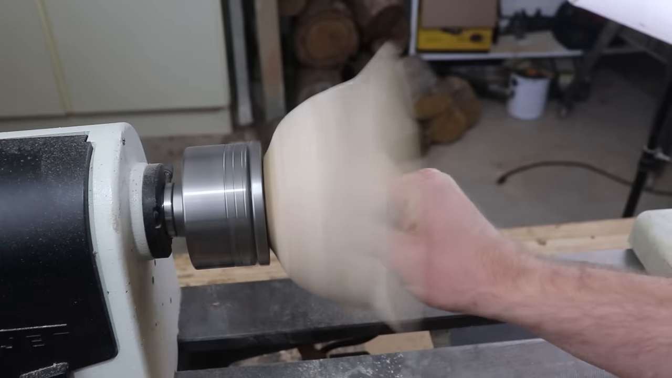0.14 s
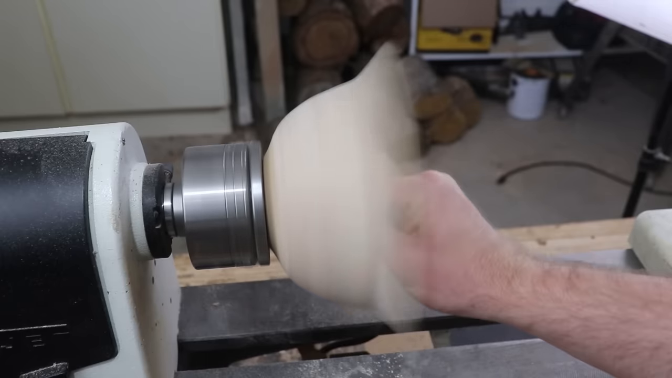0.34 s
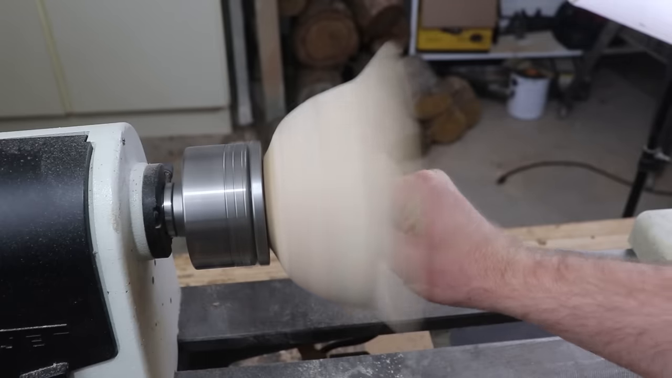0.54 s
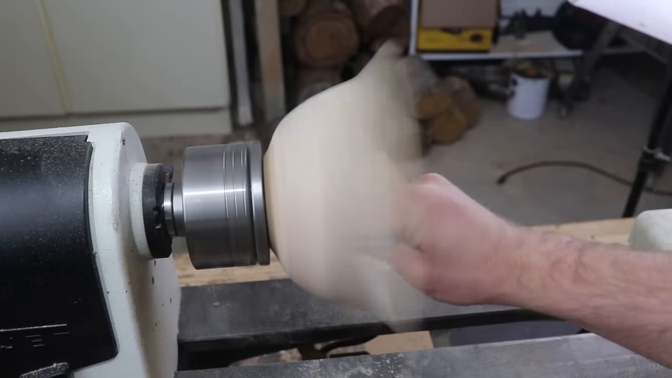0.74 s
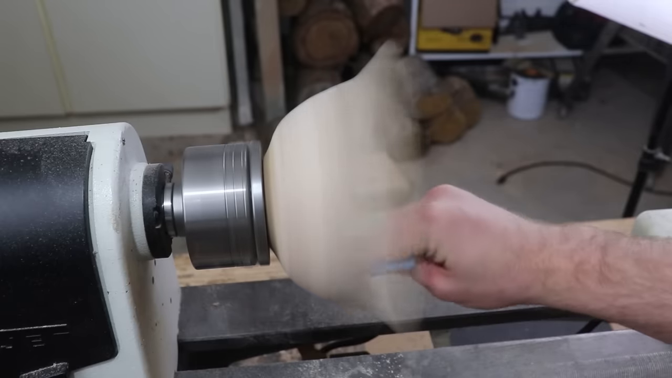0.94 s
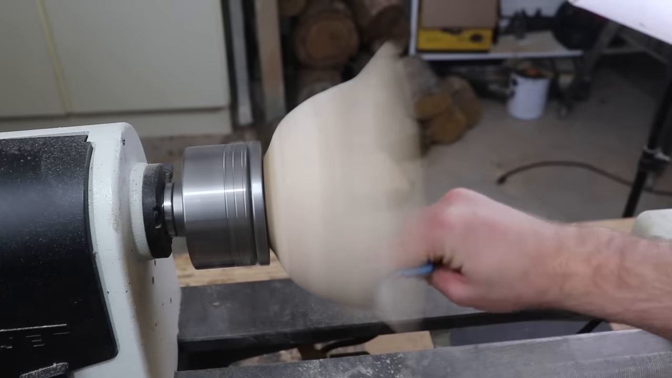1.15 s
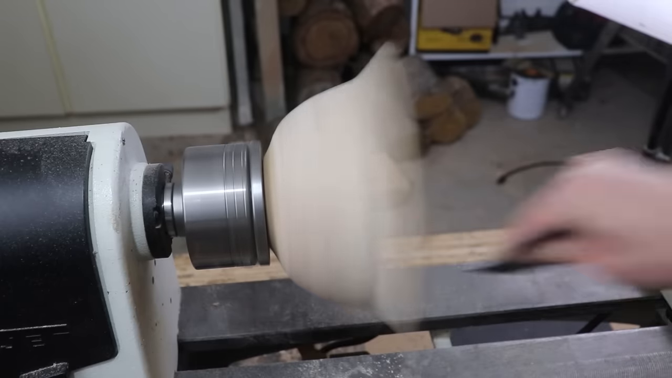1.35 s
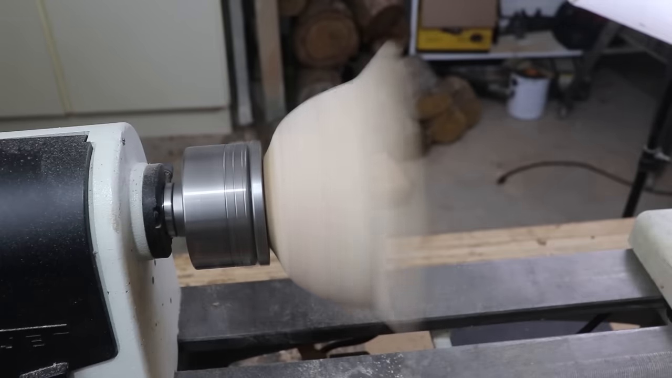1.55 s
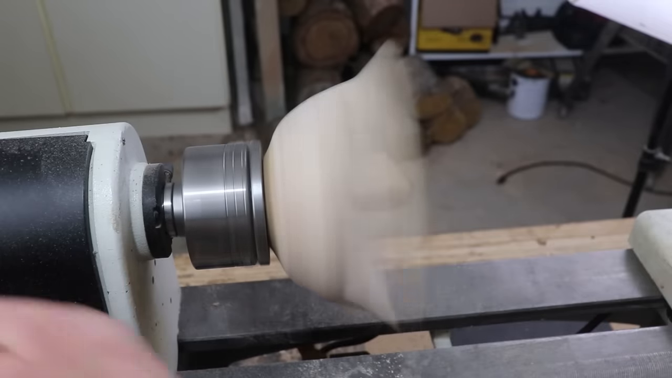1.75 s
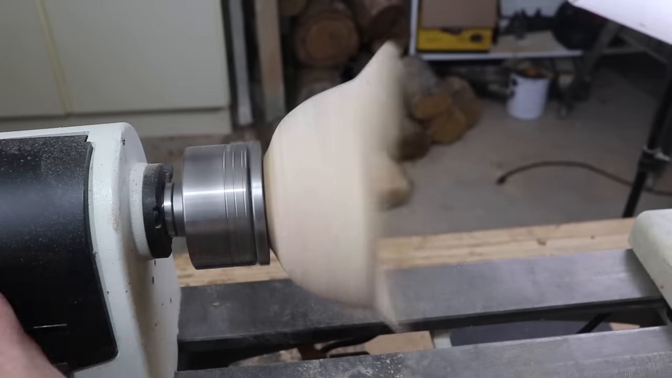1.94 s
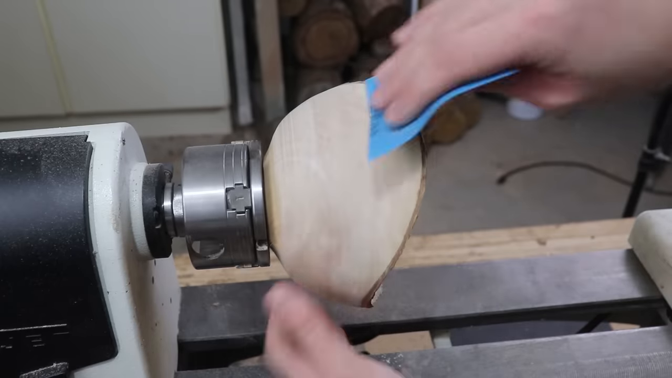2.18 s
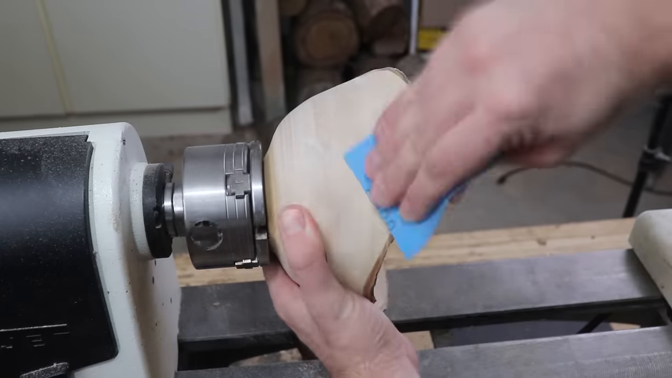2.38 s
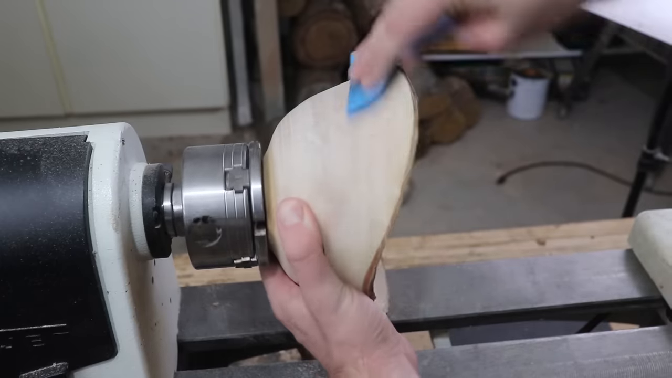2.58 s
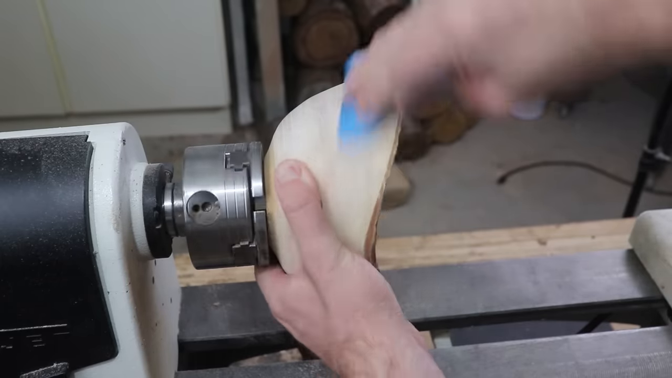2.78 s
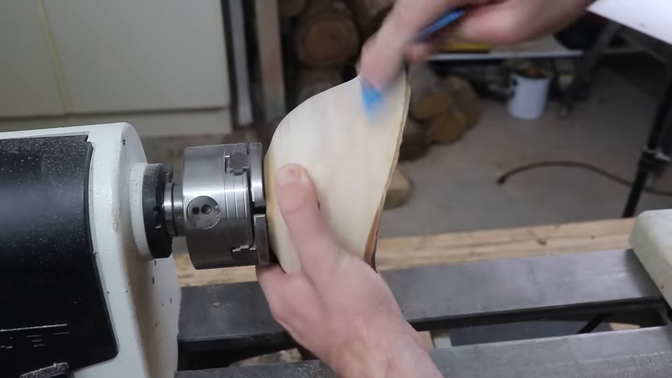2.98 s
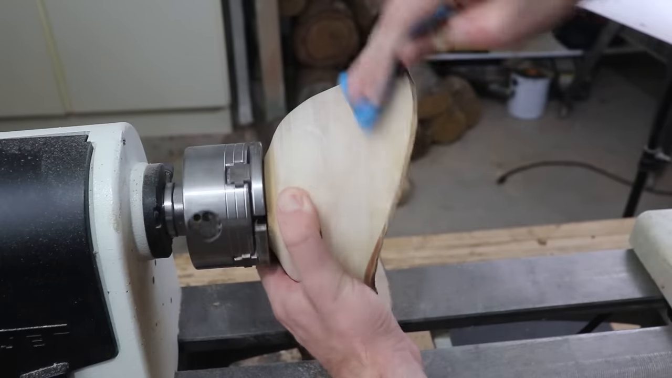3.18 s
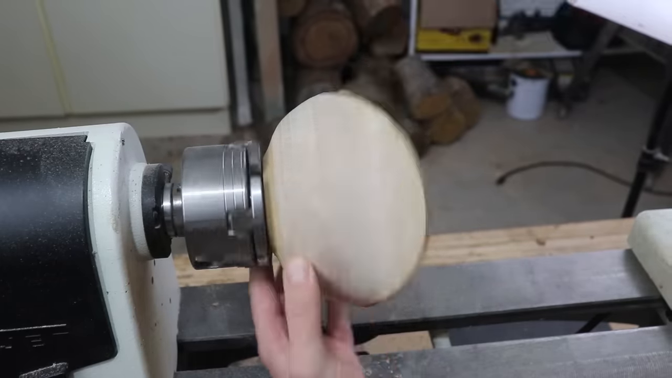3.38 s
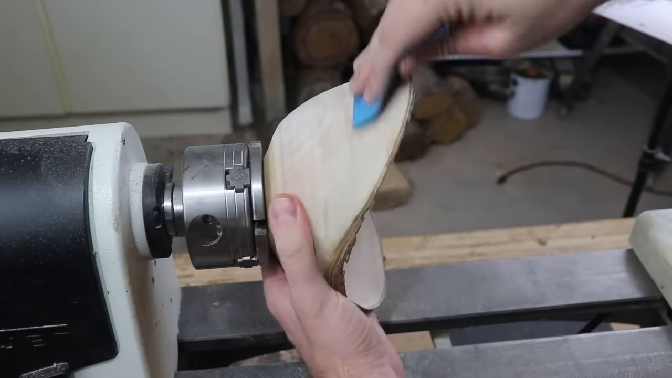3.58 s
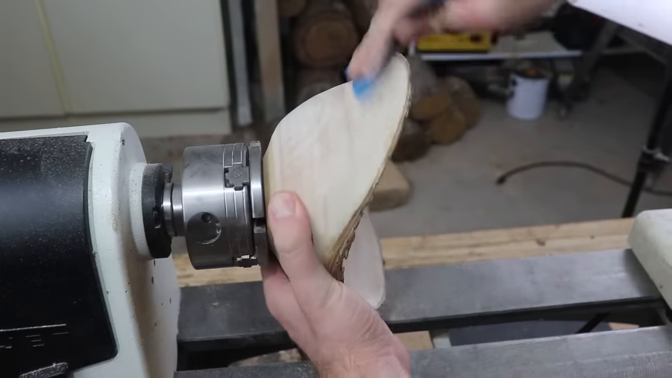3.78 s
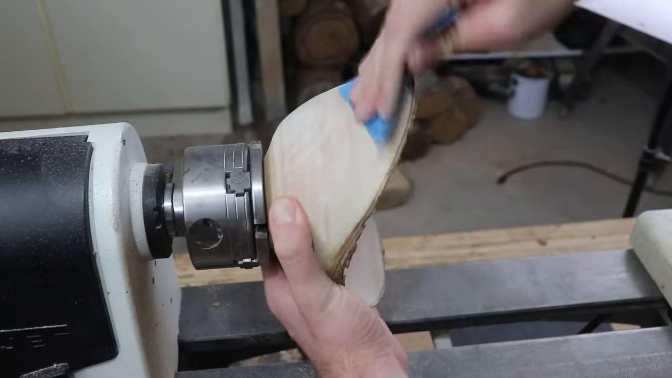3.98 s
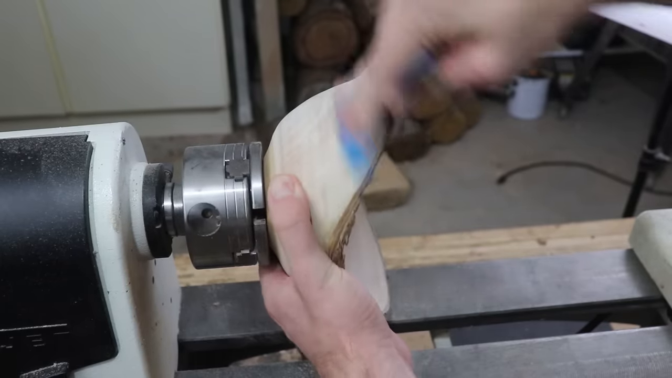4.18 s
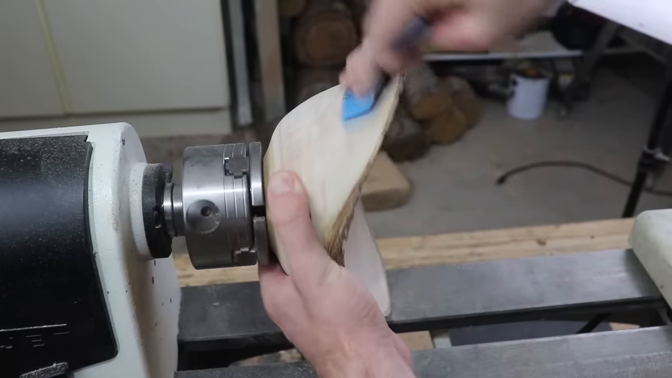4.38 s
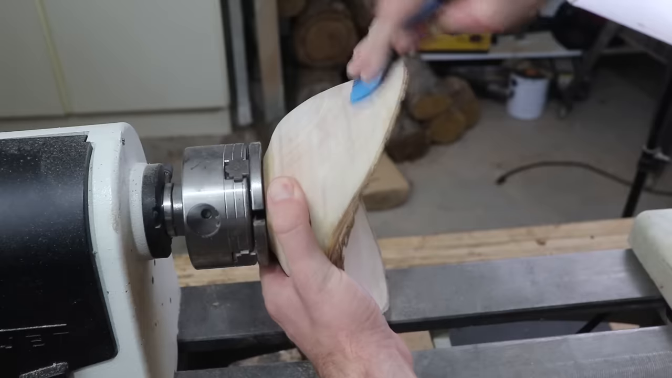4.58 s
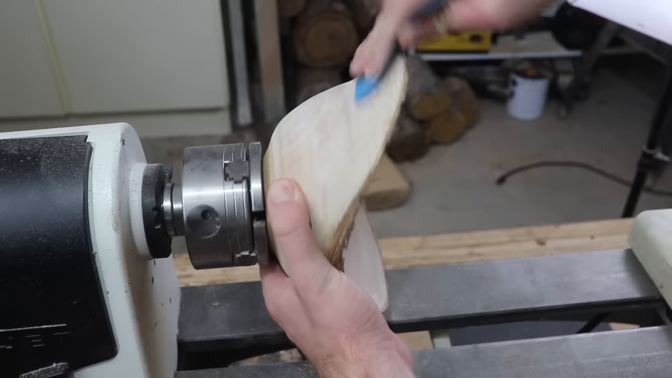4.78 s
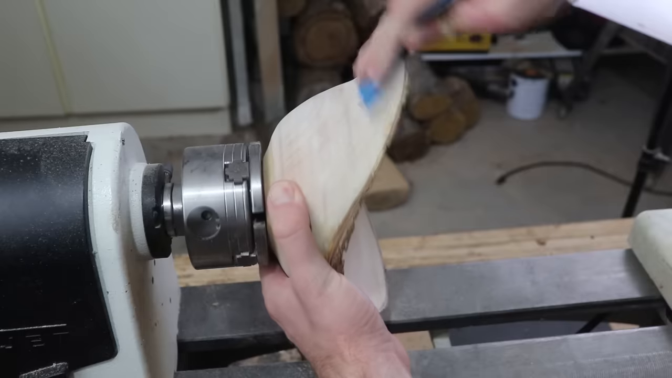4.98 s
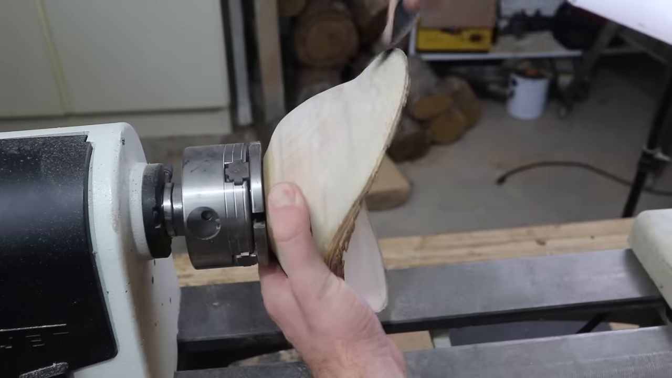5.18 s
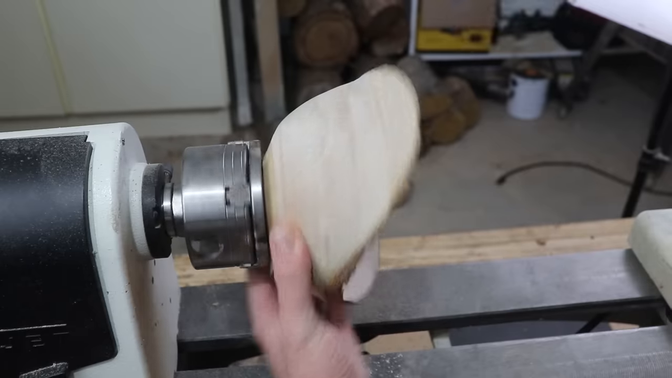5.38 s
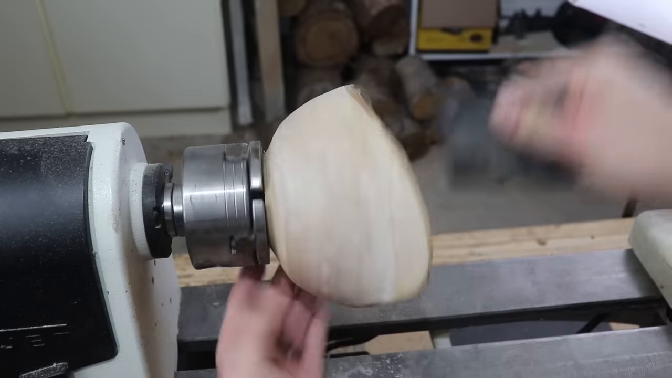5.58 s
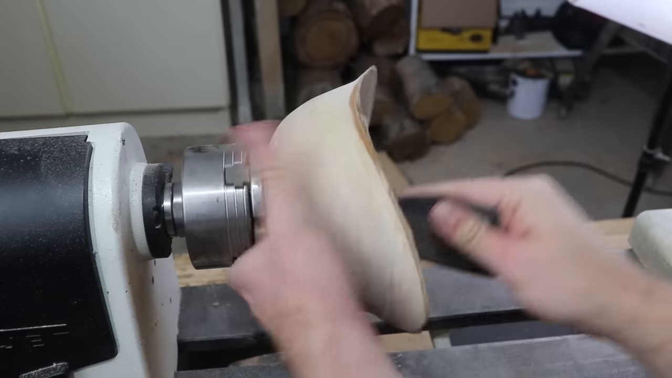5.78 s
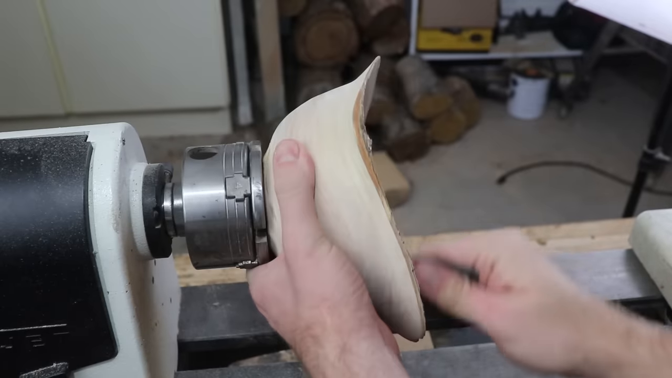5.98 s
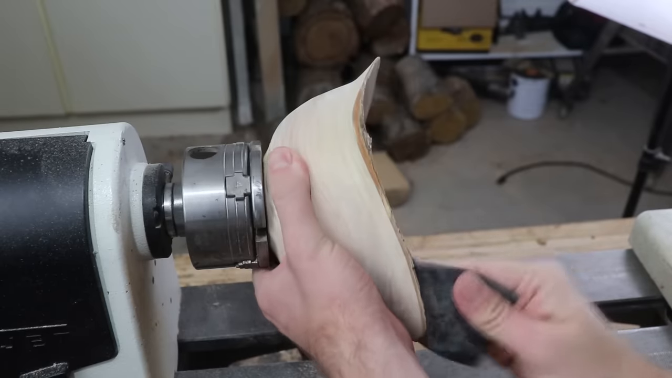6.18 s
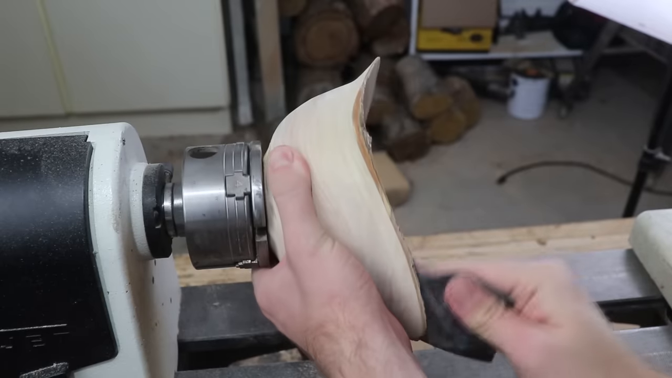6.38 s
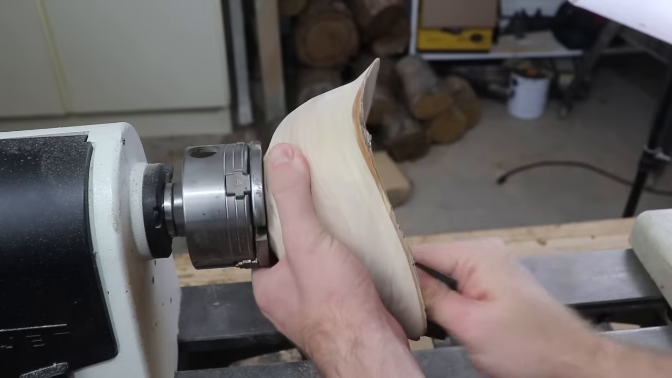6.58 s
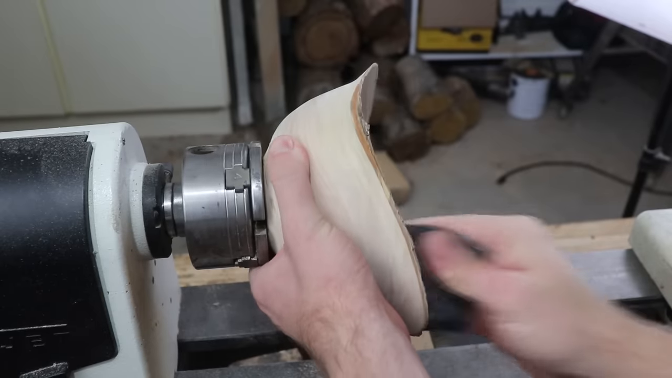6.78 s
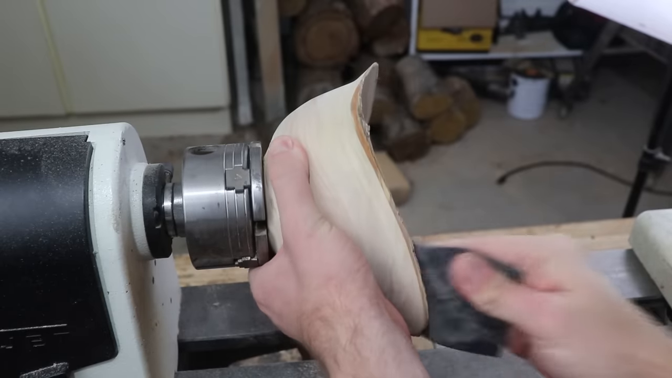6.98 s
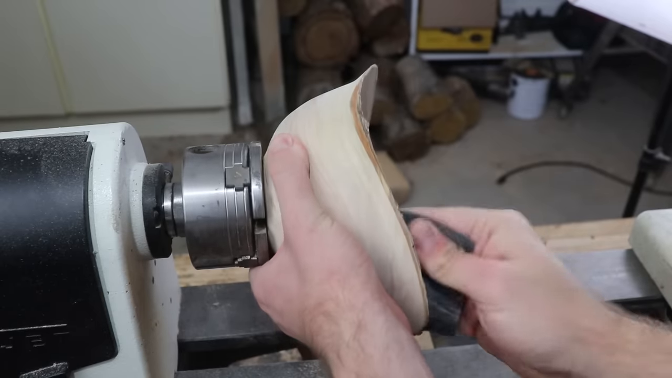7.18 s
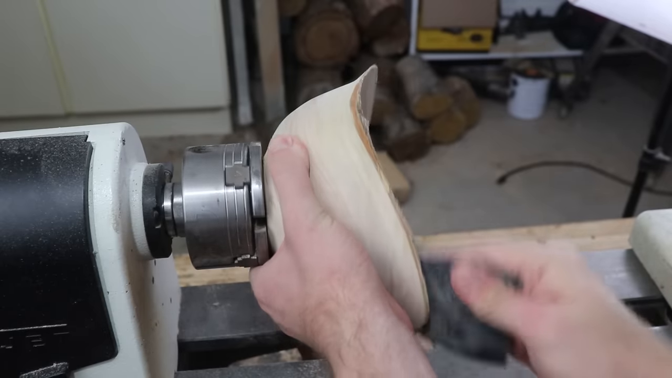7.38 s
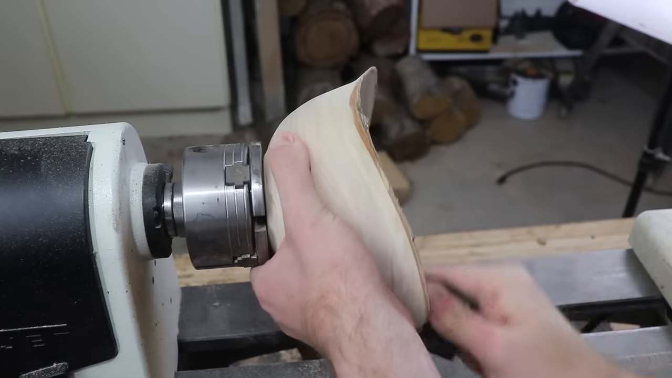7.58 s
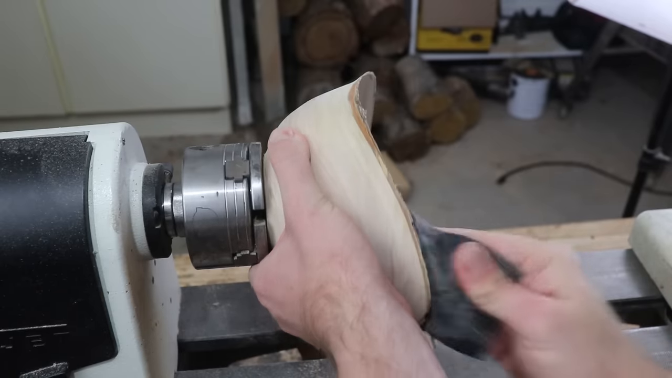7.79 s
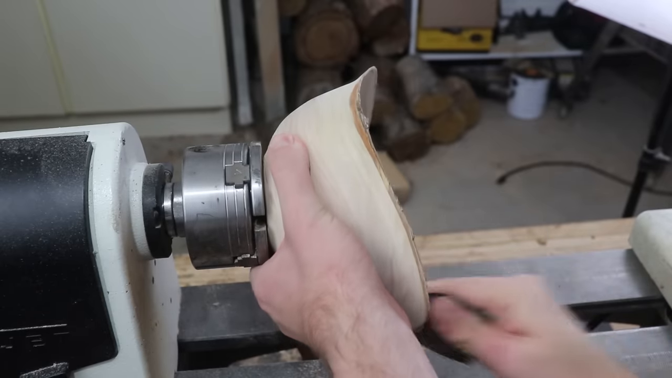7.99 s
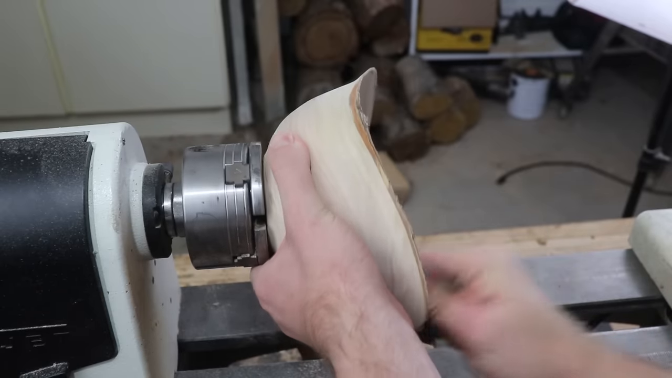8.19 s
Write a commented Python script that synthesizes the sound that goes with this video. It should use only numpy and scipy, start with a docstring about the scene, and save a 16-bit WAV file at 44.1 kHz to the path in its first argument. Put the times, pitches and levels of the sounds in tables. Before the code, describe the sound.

Sandpaper hisses on a wooden bowl spinning over a humming lathe, a switch snaps off, then frantic and slower hand-sanding strokes follow.

```python
"""Paper rasps a wooden bowl spinning on a workshop lathe: dense grit noise excites the modes of the wood.
A switch snaps as a noise crack and plastic ring; hum and rotor tones stop, whirr and casing coast on.
Sanding of the outside follows in two sped-up, time-lapse flurries of strokes that blur into a flutter;
slower hand strokes come next, ending in the hollow inside. Blows ring the bowl from the spinning onwards.
A filtered-noise wash lies under all; a far drone swells from the second flurry, then a rush passes."""
import sys
import numpy as np
from scipy import signal
from scipy.fft import rfft, irfft, next_fast_len
from scipy.io import wavfile
from scipy.ndimage import uniform_filter1d, minimum_filter1d

SR = 44100
rng = np.random.default_rng(int(sys.argv[2]) if len(sys.argv) > 2 else 0)


def amplitude_ratio(level_db):
    """Convert a level in decibels to the matching linear amplitude (field) ratio."""
    exponent = np.asarray(level_db, float) / 20
    return 10 ** exponent


def generate_wav(signal):
    """Clip the signal to [-1, 1] and save it as 16-bit WAV at the path in sys.argv[1]."""
    frames = np.transpose(np.atleast_2d(signal))
    scaled = np.clip(frames, -1, 1) * 32767
    pcm = np.round(scaled).astype(np.int16)
    wavfile.write(sys.argv[1], SR, pcm)


N = 363815

# Wash of room and outdoors, relative spectral density: f/Hz, level/dB
AIR_SPECTRUM = [(12, -56), (20, -33), (74, -3.5), (276, -5.5), (345, -7.5), (397, -6.5), (525, -6.5),
                (571, -7.5), (694, -7.5), (798, -8), (918, -6), (1520, -15), (5180, -35), (10000, -40),
                (15800, -47)]
# Wash of room and outdoors: t/s, rms level/dB
AIR_LEVEL = [(0.0, -44.5), (0.66, -47), (1.1, -47.5), (1.54, -41), (1.93, -48), (3.63, -49.5), (4.09, -51),
             (4.32, -48), (6.32, -49), (8.25, -48.5)]
# Swells of the far drone: start t/s, top t/s, end t/s, rms level at the top/dB
DRONE_SWELLS = [(3.736, 3.824, 4.36, -54), (4.2, 4.54, 4.88, -53.5), (4.82, 5.3, 5.76, -50),
                (5.6, 5.8, 6.0, -58), (6.05, 6.325, 6.76, -56)]
# Far rush that swells and passes: t/s, centre f/Hz, rms level/dB
RUSH = [(6.3, 810, -50), (6.42, 750, -53), (6.58, 635, -42.5), (7.242, 630, -43), (7.342, 646, -67)]
# Left-right likeness of wash and whirr, early and late: f/Hz, likeness (clipped to 0-1 in use)
AIR_WIDE = [(60, 0.13), (180, -0.09), (550, 0.011), (1650, -0.032), (4970, -0.027), (15000, -0.0007)]
AIR_NARROW = [(60, 0.98), (180, 1), (550, 0.94), (1650, 0.083), (4970, 0.19), (15000, 0.03)]
# Left-right likeness of the rasp, early and late: f/Hz, likeness (clipped to 0-1 in use)
RASP_WIDE = [(60, 0.029), (180, -0.09), (550, -0.044), (1650, -0.01), (4970, -0.041), (15000, 0.018)]
RASP_NARROW = [(60, 0.86), (180, 0.93), (550, 0.56), (1650, 0.62), (4970, 0.68), (15000, 0.42)]
# Phase by which left leads: f/Hz, phase/rad
LEFT_LEAD = [(0, 1), (690, -0.62), (2500, -0.22), (2930, -0.13), (3190, 0.012), (4740, -0.32),
             (6120, -0.53), (6630, -0.47), (8350, -0.93), (9560, 0.45), (9820, -0.38), (10300, -1.1),
             (14000, -0.1), (15600, -0.3)]
# Left level minus right level: f/Hz, level/dB
LEFT_TILT = [(60, 0), (130, 1), (290, -1.5), (640, -0.5), (1410, -0.5), (3100, -3.5), (6820, -1.5),
             (15000, -6)]

# Mains hum, dipping in level while the paper hisses: t/s, rms level of the fundamental/dB
HUM_LEVEL = [(0.0, -28), (0.03, -26.5), (0.208, -29.5), (0.404, -27), (0.526, -34), (0.572, -29),
             (0.798, -34.5), (0.908, -30), (1.094, -33.5), (1.38, -32.5), (1.412, -26.5), (1.63, -28)]
# Overtones of the hum: multiple, level against the fundamental/dB
HUM_ORDERS = [(2, -20), (3, -20)]
# Rotor slot tones, some about one turn rate apart: f/Hz, level against the whine/dB
SLOT_TONES = [(984.5, -26), (1046.4, 3), (1074.8, -0.5), (1104.5, -7), (1195.4, -9), (2367.8, -9),
              (2429.6, -19)]
# Low tones of the motor: f/Hz, level against the hum/dB
LOW_TONES = [(307.5, -34), (448.2, -22), (508.4, -21)]
# Rotor whine, swelling and fading: t/s, rms reference level/dB
WHINE_LEVEL = [(0.0, -45), (0.4, -50), (0.63, -46), (0.73, -50.5), (1.05, -44.5), (1.17, -55), (1.25, -45),
               (1.32, -54), (1.412, -39), (1.52, -48), (1.63, -46)]
# Whirr, relative spectral density: f/Hz, level/dB
WHIRR_SPECTRUM = [(88, -17), (150, -5), (172, -31), (447, -9), (902, -34), (1050, -30), (1360, -18.5),
                  (2440, -17), (3740, -28), (10900, -39), (15800, -52)]
# Coasting after the switch: t/s, rms level of the whirr/dB
COAST_LEVEL = [(1.64, -38), (1.75, -45.5), (1.9, -47), (2.0, -50), (2.1, -72), (2.25, -70)]
# Casing and bearing resonances in the whirr: f/Hz, width/Hz, level against the whirr/dB
CASING_MODES = [(198.3, 3.8, -5.5), (274, 2.9, -14.5), (313, 10, -7), (1090, 80, -14), (2410, 43, -11.5),
                (3410, 80, -19), (4930, 330, -19), (10700, 100, -24), (10900, 200, -34), (12200, 350, -28)]

# Contacts of the switch snapping and bouncing: t/s, level of the snap/dB
CONTACTS = [(1.638, -15), (1.6403, -13.5), (1.6418, -5.5), (1.644, -13), (1.655, -28), (1.665, -24),
            (1.673, -39)]
# Plastic box modes: f/Hz before random spread, level/dB, decay scale/s (t60 is 0.35 of it)
PLASTIC_MODES = [(805, -21, .05), (1220, -14, 0.051), (2040, -16, .035), (2760, 4.5, 0.034),
                 (3900, -4, .025), (5870, 1.5, 0.018), (6900, -7, .025), (9300, -5, .022),
                 (12500, -11, .017)]
# Knocks on bowl and lathe: t/s, peak level of the ring/dB, centre f/Hz, spread/octave,
# blow length/ms (twice its decay constant)
KNOCKS = [(1.318, -24.5, 3400, .3, 4), (1.366, -25, 3300, 0.56, 5.3), (1.817, -30, 333, 0.11, 7.3),
          (2.18, -39.5, 620, 0.31, 23), (2.339, -20.5, 1530, 0.69, 4), (2.95, -24.5, 2200, 1.5, 5.2),
          (3.40, -40, 750, 0.32, 60), (3.969, -27, 1700, 1.2, 8.9), (4.156, -18, 1900, 0.38, 2.5),
          (4.165, -24.5, 2060, .2, 15), (4.384, -29, 2020, 0.26, 14), (5.403, -47, 1525, .2, 2),
          (5.901, -39, 1525, 0.26, 3), (5.931, -40.5, 200, 0.34, 30), (6.116, -33, 1300, 0.57, 5),
          (7.991, -40.5, 880, 0.13, 14)]
# Modes of the wooden bowl: f/Hz, half-power width/Hz (widened for knocks), relative level/dB
BOWL_MODES = [(200, 20, 0), (320, 86, 2), (436, 180, 9), (620, 73, -9), (880, 79, -12.5), (1190, 100, 0),
              (1525, 105, -0.5), (2060, 240, -3.5), (2610, 330, 3), (3256, 140, 7.5), (4100, 230, -7),
              (4220, 140, 5)]

# Paper on the spinning bowl, moving out to the rim: t/s, relative level/dB,
# rasp near 2.7 kHz/dB (its median is taken off), rumble near 800 Hz/dB, brightness/(dB per octave)
SPIN = [(0.085, -51, -2, -6, 15), (0.135, -36.5, -15, -10, 3), (0.169, -31, -9.5, 0, 2),
        (0.42, -32, -9, -4, 2), (0.53, -32, 4, -18, 2.5), (0.553, -31, -9.5, -5, 0),
        (0.75, -31.5, -6, -3, 1.3), (0.933, -31, -4.5, 7.5, 2), (1.355, -31.5, -2.5, 12.5, 2.4),
        (1.373, -31, -8, -8, -3.5), (1.4, -49, -3, -4, -3)]
# Colour of the rasp while spinning, on the outside and inside: f/Hz, relative level/dB
SPINNING_COLOUR = [(290, -47), (500, -9), (561, -25), (668, -4.5), (783, -14.5), (931, 1.5), (1080, -6.5),
                   (1320, -8), (2600, -2.5), (8630, -4.5), (13500, -14.5), (15800, -18)]
OUTSIDE_COLOUR = [(290, -35), (500, -18.5), (817, -14), (1140, -18.5), (1520, -10.5), (1780, -9.5),
                  (2060, -11), (2220, -10.5), (2680, -4), (7910, 4), (13300, 1), (15800, -4.5)]
INSIDE_COLOUR = [(290, -35), (500, -22), (668, -14.5), (1260, -12), (1480, -5.5), (2060, -6), (2250, -3.5),
                 (4010, 0.5), (4700, -2.5), (7260, -3.5), (12900, -13.5), (15800, -19.5)]
# Two sped-up flurries of to-and-fro strokes:
# t/s, stroke number, relative level/dB, brightness/(dB per octave)
FLURRIES = [
    [(2.315, 0, -30.5, -1), (2.365, 2, -28.5, -.5), (2.45, 6, -27, 0), (2.687, 17, -28.5, 0),
     (2.745, 19, -27.5, 0), (2.866, 24, -27.5, .3), (3.0, 30, -31, -1.5), (3.031, 31, -29, -1.5),
     (3.059, 32, -28.5, -0.5), (3.095, 34, -27, -1), (3.123, 35, -29.5, -0.5), (3.195, 38, -29, 0.5),
     (3.3, 43, -28, -1), (3.373, 47, -29.5, -2)],
    [(3.64, 49, -33.5, 0.8), (3.667, 50, -29, 0.5), (3.848, 59, -28.5, 0.5), (3.954, 64, -28, -0.5),
     (4.047, 68, -29.5, .5), (4.128, 72, -27.5, -2), (4.146, 73, -30, -0.5)],
]
# Slow strokes: start t/s, stop t/s, relative level/dB, bite f/Hz, gain of the bite at mid-stroke/dB
SLOW = [(4.17, 4.209, -27.5, 2300, 6), (4.254, 4.322, -29, 3000, 3), (4.382, 4.447, -29.5, 2020, 8.5),
        (4.498, 4.539, -29, 4000, -1.5), (4.579, 4.645, -29.5, 4000, .5), (4.699, 4.742, -29, 2800, 1.5),
        (4.791, 4.845, -32.5, 3400, 0), (4.891, 4.941, -31, 4040, 4), (4.995, 5.046, -33.5, 4200, 1),
        (5.086, 5.136, -31.5, 4020, 3.5), (5.181, 5.272, -32, 3240, 3), (6.165, 6.257, -34.5, 3900, 6),
        (6.313, 6.372, -32, 2880, 3), (6.432, 6.52, -34, 4200, 4.5), (6.551, 6.617, -35, 3900, -1.5),
        (6.63, 6.664, -31, 3880, 8), (6.718, 6.804, -32, 3080, -2.5), (6.868, 6.897, -34, 4000, -1),
        (6.928, 6.952, -29.5, 3840, 3.5), (7.006, 7.118, -30.5, 2600, -2.5), (7.185, 7.278, -30, 2480, 4.5),
        (7.324, 7.429, -31, 3840, -1.5), (7.486, 7.615, -32, 3200, 3.5), (7.63, 7.721, -30, 4000, 1),
        (7.768, 7.852, -30.5, 4000, -1), (7.904, 8.031, -31, 3780, 5), (8.049, 8.096, -33.5, 4000, -3.5),
        (8.104, 8.186, -30.5, 4200, 3), (8.199, 8.26, -34, 4000, 0)]
# Brightness of the slow strokes: t/s, brightness/(dB per octave)
SLOW_BRIGHTNESS = [(4.19, -2.5), (4.3, -0.9), (4.55, 0.5), (5.22, -1.65), (6.2, 1.5), (6.65, 0.5),
                   (7.05, 1.1), (7.8, 2.5), (8.24, 1.5)]
# Light brushes and rustles; the first row is the noise tail of the switch:
# start t/s, stop t/s, relative level/dB, brightness/(dB per octave)
BRUSHES = [(1.646, 1.68, -46, -6.5), (1.82, 1.836, -48, -7), (1.945, 1.949, -49.5, 4),
           (2.167, 2.175, -51.5, 2), (2.257, 2.275, -54, -3), (2.274, 2.295, -36.5, -1),
           (3.414, 3.414, -47, -3.5), (3.504, 3.511, -54.5, -2), (3.534, 3.545, -59, -1),
           (3.57, 3.596, -58, -2), (5.386, 5.455, -68, -3), (5.57, 5.624, -61, -.4), (5.69, 5.75, -69, 2),
           (5.802, 5.86, -62, 2), (5.92, 5.974, -53, -3), (6.085, 6.084, -52, 4), (6.099, 6.101, -50, -1),
           (6.116, 6.128, -46.5, 0.5)]

OFF_S = 1.64  # the motor is switched off
OUTSIDE_S, INSIDE_S = 2.2, 5.5  # the colour turns to the outside, then to the inside
NARROW_S = 4.155  # the stereo image narrows and the tail lengthens


def evened(x):
    """Normalisation: scales a signal to rms 1."""
    return x / np.sqrt(np.mean(x ** 2) + 1e-20)


def read(points, hz):
    """Interpolation along a logarithmic frequency axis, returned as a column."""
    f, value = np.transpose(points)
    return np.interp(np.log(hz + 1), np.log(f + 1), value)[:, None]


def curve(rows, t):
    """Linear interpolation of each table column at the times t."""
    s, *columns = np.transpose(rows)
    return [np.interp(t, s, c) for c in columns]


def resonate(x, hz, width):
    """Heterodyned one-pole resonance: gain 1 at a centre that may follow a pitch curve."""
    turn = np.exp(2j * np.pi * np.cumsum(hz * np.ones(len(x))) / SR)
    r = np.exp(-np.pi * width / SR)
    return 2 * (turn * signal.lfilter([1 - r], [1, -r], x / turn + 1e-18)).real


def colour(pair, size, gain_db, wide, narrow, patchy_db):
    """Time-varying spectral shaping: mixing two noises sets the coherence of left and right."""
    overlap = size * 3 // 4
    hz, t, (a, b) = signal.stft(pair, SR, nperseg=size, noverlap=overlap)
    patches = rng.standard_normal(a.shape)
    patches = uniform_filter1d(patches, size=size // 64, axis=0)
    patches = evened(uniform_filter1d(patches, size=2 ** 13 // size, axis=1))
    same = np.clip(np.where(t < NARROW_S, read(wide, hz), read(narrow, hz)), 0, 1)
    left = a * np.exp(1j * read(LEFT_LEAD, hz))
    right = same * a + np.sqrt(1 - same ** 2) * b
    half_tilt = amplitude_ratio(read(LEFT_TILT, hz) / 2)
    z = np.array([left * half_tilt, right / half_tilt])
    z *= amplitude_ratio(gain_db(hz, t) + patchy_db * patches)
    return signal.istft(z, SR, nperseg=size, noverlap=overlap)[1][:, :N]


def room(x, t60, tail_db):
    """Reverberation: sparse taps decay exponentially, drawn separately for each side."""
    grid = np.arange(300, SR // 2, 20)
    at = grid[None] + rng.integers(0, 20, (2, len(grid)))
    taps = np.zeros((2, SR // 2 + 20))
    np.put_along_axis(taps, at, rng.choice([-1., 1.], at.shape) * amplitude_ratio(-60 * at / SR / t60), 1)
    taps = signal.lfilter([1], [1, -.3], taps)  # walls keep less treble
    tail = signal.fftconvolve(x, taps / np.linalg.norm(taps[0]), axes=1)[:, :N]
    return x + amplitude_ratio(tail_db) * tail


def wash(t):
    """Broadband ambience: noise weighted towards low frequencies, from the room and outdoors."""
    noise = rng.standard_normal((2, N))
    shaped = colour(noise, 2048, lambda hz, _: read(AIR_SPECTRUM, hz), AIR_WIDE, AIR_NARROW, patchy_db=1.45)
    return amplitude_ratio(curve(AIR_LEVEL, t)[0]) * evened(shaped)


def drone(t):
    """Frequency glide: a far sine comes in swells while its pitch creeps upward."""
    first_hz, hz_per_s = 334.7, 1.1
    swells = sum(amplitude_ratio(db) * np.interp(t, [a, top, b], [0, 1, 0]) ** 0.65 for a, top, b, db in DRONE_SWELLS)
    hz = first_hz + hz_per_s * (t - DRONE_SWELLS[0][0])
    return np.sqrt(2) * swells * np.sin(2 * np.pi * np.cumsum(hz) / SR)


def rush(t):
    """Moving band-pass resonance: noise swells and passes as its centre sinks."""
    hz, db = curve(RUSH, t)
    sides = [resonate(resonate(n, hz, 450), hz, 410) for n in rng.standard_normal((2, N))]
    sides = np.array(sides)
    out = evened(sides + 0.18 * sides[::-1]) * amplitude_ratio(db)
    fade_in = np.clip((t - RUSH[0][0]) / 0.09, 0, 1)
    fade_out = np.clip((RUSH[-1][0] - t) / 0.077, 0, 1)
    return out * fade_in * fade_out


def air():
    """Superposition of the ambient wash, the far drone and the passing rush."""
    t = np.arange(N) / SR
    return wash(t) + drone(t) + rush(t)


def motor_tones(t, hum_db, count):
    """Random modulation: rotor tones flutter in level and waver in phase, against the hum level."""
    flutter_db, waver_rad, lead_rad = 2.5, 0.87, 1.64  # rms, rms, left ahead of right
    whine_db = curve(WHINE_LEVEL, t)[0]
    tones = list(SLOT_TONES) + list(LOW_TONES)
    out = np.zeros((2, N))
    chances = rng.standard_normal((len(tones), 3, count // 400 + 2))
    knots = np.arange(chances.shape[2]) * 400 / SR
    for i, ((hz, db), chance) in enumerate(zip(tones, chances)):
        waver = [np.interp(t, knots, evened(uniform_filter1d(c, size=14))) for c in chance]
        phase = 2 * np.pi * hz * t + waver_rad * waver[2] + lead_rad * np.array([[.5], [-.5]])
        level_db = db + (whine_db - hum_db if i < len(SLOT_TONES) else 0)
        out += amplitude_ratio(level_db + flutter_db * np.array(waver[:2])) * np.cos(phase)
    return out


def hum(t):
    """Harmonic series: the mains hum has phase-locked overtones and reaches left a little earlier."""
    turns = 2 * np.pi * 120.05 * t + np.array([[.15], [-.15]])
    return np.cos(turns) + sum(amplitude_ratio(db) * np.cos(k * turns + 2.44) for k, db in HUM_ORDERS)


def casing(count):
    """Resonance under random excitation: casing and bearings ring in narrow bands."""
    out = np.zeros((2, N))
    for hz, width, db in CASING_MODES:
        a, b = [evened(resonate(n, hz, width)) for n in rng.standard_normal((2, count))]
        out[:, :count] += amplitude_ratio(db) * np.array([a, .5 * a + 1.1 * b])
    return out


def whirr():
    """Broadband noise of rotation: two noises share one fixed spectral slope."""
    noise = rng.standard_normal((2, N))
    return evened(colour(noise, 1024, lambda hz, _: read(WHIRR_SPECTRUM, hz), AIR_WIDE, AIR_WIDE, patchy_db=2.6))


def lathe():
    """Driven against stored energy: hum and tones stop at the switch, whirr and casing coast on."""
    t = np.arange(N) / SR
    hum_db, coast_db = curve(HUM_LEVEL, t)[0], curve(COAST_LEVEL, t)[0]
    end_s = COAST_LEVEL[-1][0]
    count = round(end_s * SR)
    live = np.clip((OFF_S - t) / 0.0048, 0, 1)
    live += 0.15 * amplitude_ratio(-250 * np.maximum(t - OFF_S, 0)) * (t > OFF_S)  # brief remnant
    electric = np.sqrt(2) * amplitude_ratio(hum_db) * live * (hum(t) + motor_tones(t, hum_db, count))
    whirr_db = np.where(t < OFF_S, hum_db - 15, coast_db)
    return electric + amplitude_ratio(whirr_db) * (t < end_s) * (whirr() + casing(count))


def switch():
    """Impulsive excitation: bouncing contacts crack as noise and ring the modes of a plastic box."""
    t, out = np.arange(2000) / SR, np.zeros(N)
    spreads = rng.uniform(0.92, 1.04, (len(CONTACTS), len(PLASTIC_MODES)))
    cracks = rng.standard_normal((len(CONTACTS), 2000))
    for (s, db), spread, crack in zip(CONTACTS, spreads, cracks):
        ring = np.zeros(2000)
        for (f, gain, decay), k in zip(PLASTIC_MODES, spread):
            ring += amplitude_ratio(gain - 60 * t / (0.35 * decay)) * np.sin(2 * np.pi * f * k * t)
        snap = ring / abs(ring).max() + 0.19 * uniform_filter1d(crack, size=4) * amplitude_ratio(-60 * t / 0.039)
        out[round(s * SR):][:2000] += amplitude_ratio(db) * snap * np.minimum(t / 0.00045, 1)
    return out


def knocks():
    """Modal excitation: a blow rings the bowl modes nearest its centre, with a scrape and a dry tick."""
    out, t = np.zeros(N + 6000), np.arange(6000) / SR
    for (s, db, hz, spread, ms), noise in zip(KNOCKS, rng.standard_normal((len(KNOCKS), 6000))):
        blow = noise * t * np.exp(-t * 2000 / ms)
        ring = np.zeros(6000)
        for f, width, gain in BOWL_MODES:
            near_db = gain - 5.9 * (np.log2(f / hz) / spread) ** 2
            ring += amplitude_ratio(near_db) * resonate(resonate(blow, f, 2 * width), f, 5 * width)
        tick = np.diff(blow, prepend=0)
        scrape_width = .8 * spread * hz
        scrape = resonate(resonate(tick, hz, scrape_width), hz, scrape_width)
        tick_db = -32 + 7 * np.log2(hz / 1000)  # higher knocks tick harder
        mix = ring / abs(ring).max() + amplitude_ratio(-7.5) * scrape / abs(scrape).max()
        mix += amplitude_ratio(tick_db) * tick / abs(tick).max()
        out[round(s * SR):][:6000] += amplitude_ratio(db) * mix
    return out[:N]


def flurry_strokes():
    """Alternating motion, sped up: even strokes push short and hard, odd ones pull longer and lighter."""
    rise_ms, fall_ms, scatter_db, scatter_ms = 2, 2.05, 1.3, 1.2
    push, pull, pull_db = 0.41, 0.56, -1  # push and pull are shares of the gap to the next stroke
    chance, rows = rng.standard_normal((80, 2)), []
    for flurry in FLURRIES:
        s, number, db, bright = np.transpose(flurry)
        for k in range(round(number[0]), round(number[-1]) + 1):
            gap = np.diff(np.interp([k - .5, k + .5], number, s))[0]
            if k in number[[0, -1]].round():
                gap *= 2  # at either end of the table only half the gap is spanned
            middle = np.interp(k, number, s) + scatter_ms / 1000 * chance[k, 0]
            half = (pull if k % 2 else push) * gap / 2
            level_db = np.interp(k, number, db) + pull_db * (k % 2) + scatter_db * chance[k, 1]
            rows.append((middle - half, middle + half, level_db, rise_ms, fall_ms, np.interp(k, number, bright)))
    return rows


def slow_strokes():
    """Onset scaling: longer strokes start and stop more softly."""
    rows = []
    for a, b, db, *_ in SLOW:
        ms = (b - a) * 1000
        bright = curve(SLOW_BRIGHTNESS, (a + b) / 2)[0]
        rows.append((a, b, db, 2.45 + 0.026 * ms, 4.5 + 0.031 * ms, bright))
    return rows


def rustles():
    """Edge softening with length: the noise tail of the switch, then light brushes and rustles."""
    rows = []
    for a, b, db, bright in BRUSHES:
        soften_ms = 0.064 * (b - a) * 1000
        rows.append((a, b, db, 1.1 + soften_ms, 0.96 + soften_ms, bright))
    return rows


def strokes():
    """Sequence of bursts: start t/s, stop t/s, level/dB, rise/ms, fall/ms, brightness/(dB per octave)."""
    return flurry_strokes() + slow_strokes() + rustles()


def pressure(t):
    """Addition of powers: bursts with logistic edges give total power and power-weighted brightness."""
    start, stop, level_db, rise, fall, bright = np.transpose(strokes())[:, :, None]
    edge = lambda x: (1 + np.tanh(x / 2)) / 2
    power = amplitude_ratio(2 * level_db) * edge((t - start) * 1000 / rise) * edge((stop - t) * 1000 / fall)
    spin_db, _, _, spin_bright = curve(SPIN, t)
    spin = amplitude_ratio(2 * spin_db) * (t > SPIN[0][0]) * (t < SPIN[-1][0])
    total = power.sum(0) + spin + 1e-12
    tone = ((power * bright).sum(0) + spin * spin_bright) / total
    # slower paper at the turns of a stroke sounds duller
    top = -minimum_filter1d(-total, size=700)
    return total, tone + 0.38 * np.maximum(10 * np.log10(total / top), -15)


def grit_noise():
    """Shot noise: dense random ticks of grit over a steady hiss, as the paper catches and lets go."""
    grit = amplitude_ratio(1.6 * np.minimum(rng.exponential(1, N), 6)) * (rng.random(N) < 9000 / SR)  # 9000 per s
    drive = 0.46 * evened(grit) * rng.standard_normal((2, N)) + rng.standard_normal((2, N))
    catch_db = evened(uniform_filter1d(rng.standard_normal(N), size=130))
    return evened(drive) * amplitude_ratio(catch_db)


def rasp_gain(hz, frames, t, tone):
    """Spectral envelope: surface and brightness set the colour, 2.5-15.5 kHz power is held constant."""
    _, rasp_db, rumble_db, _ = curve(SPIN, t)
    rasp_db = rasp_db - np.median(np.transpose(SPIN)[2])
    f_hz = hz[:, None] + 50
    rasp = np.exp(-(np.log2(f_hz / 2700) / 0.63) ** 2) * (frames < SPIN[-1][0])
    rumble = np.exp(-(np.log2(f_hz / 850) / .5) ** 2) * np.interp(frames, t, rumble_db)
    by_hand = np.where(frames < INSIDE_S, read(OUTSIDE_COLOUR, hz), read(INSIDE_COLOUR, hz))
    shape = np.where(frames < OUTSIDE_S, read(SPINNING_COLOUR, hz) + rumble, by_hand)
    shape = shape + rasp * np.interp(frames, t, rasp_db)
    shape += np.interp(frames, t, tone) * np.log2(f_hz / 5500)
    for a, b, _, f, db in SLOW:
        near_pitch = np.exp(-(np.log2((hz + 50) / f) / 0.25) ** 2)
        mid_stroke = np.exp(-((frames - (a + b) / 2) / (.5 * (b - a) + 0.03)) ** 2)
        shape += db * np.outer(near_pitch, mid_stroke)
    band = (hz > 2500) & (hz < 15500)
    return shape - 10 * np.log10(amplitude_ratio(2 * shape[band]).sum(0) / len(hz)) + 2.0


def bowl_response(rasp):
    """Forced vibration: the bowl's modes sing along, and one near 1.5 kHz rings on in hand sanding."""
    size = next_fast_len(N + 4000)
    hz = np.arange(size // 2 + 1) * SR / size
    ring = sum(amplitude_ratio(db) / (1 + 2j * (hz - f) / w) for f, w, db in BOWL_MODES)
    sing = resonate(rasp.mean(0) * (np.arange(N) > OUTSIDE_S * SR), 1511, 73)
    return irfft(rfft(rasp, size) * (1 + 0.15 * ring), size)[:, :N] + amplitude_ratio(1) * sing


def sanding():
    """Abrasion: grit tears at the wood; pressure sets the level, the bowl and the speed the colour."""
    t = np.arange(0, N + 16, 16) / SR
    total, tone = pressure(t)
    drive = grit_noise() * np.interp(np.arange(N) / SR, t, np.sqrt(total))
    gain_db = lambda hz, frames: rasp_gain(hz, frames, t, tone)
    return bowl_response(colour(drive, 256, gain_db, RASP_WIDE, RASP_NARROW, patchy_db=1.5))


def scene():
    """Superposition: near sources get the workshop's tail, short at first and longer in slow strokes."""
    background = air() + lathe()
    near = (switch() + knocks()) * amplitude_ratio([[-1.2], [1.2]]) + sanding()
    early = np.arange(N) < NARROW_S * SR
    short_tail = room(near * early, t60=0.098, tail_db=-17.0)
    long_tail = room(near * ~early, t60=0.42, tail_db=-12.5)
    return background + short_tail + long_tail


def band_limit(x):
    """A steep low-pass at the top of the band."""
    return signal.sosfilt(signal.butter(12, 15990, fs=SR, output="sos"), x)


def record(dry):
    """Final stage: the finished mix passes on with no further source added."""
    return band_limit(dry)


dry = scene()
out = record(dry)
generate_wav(out)
```